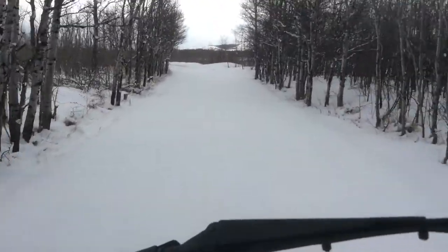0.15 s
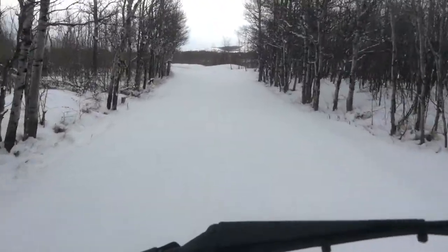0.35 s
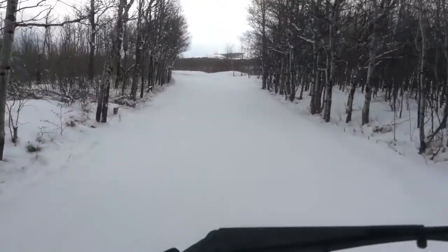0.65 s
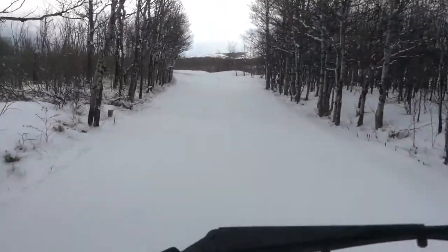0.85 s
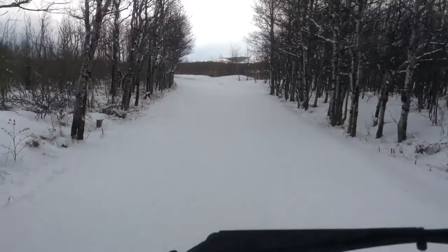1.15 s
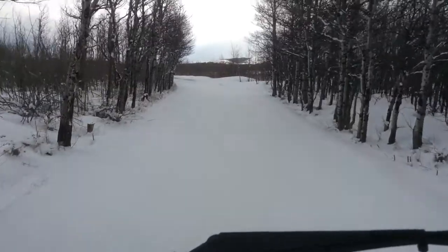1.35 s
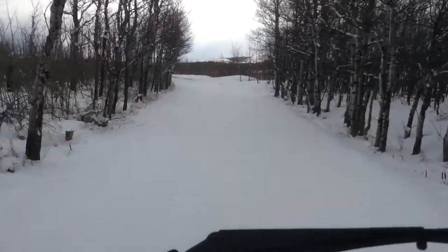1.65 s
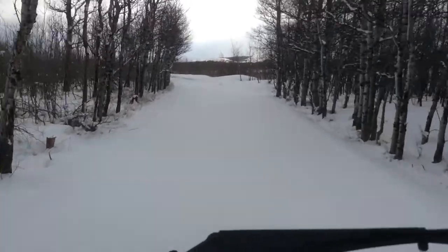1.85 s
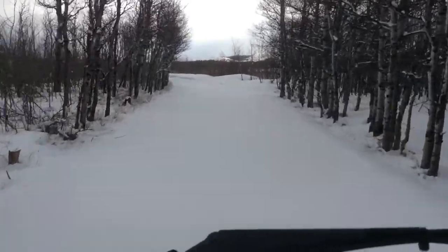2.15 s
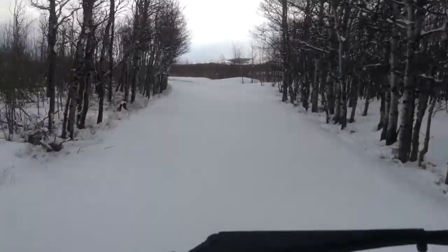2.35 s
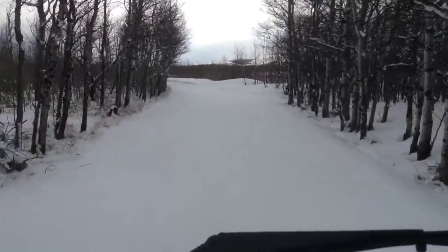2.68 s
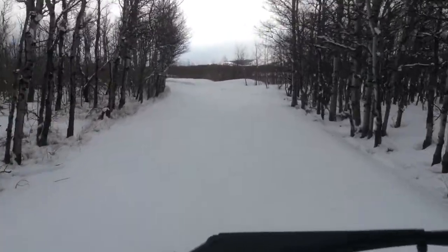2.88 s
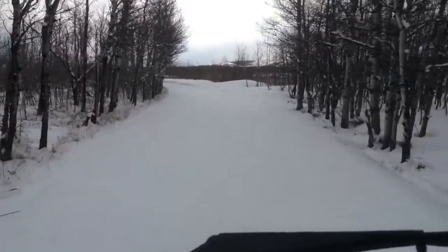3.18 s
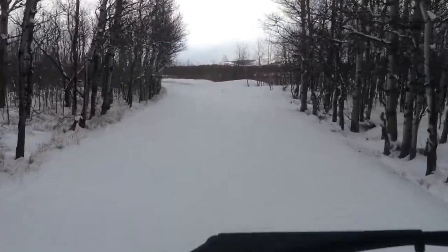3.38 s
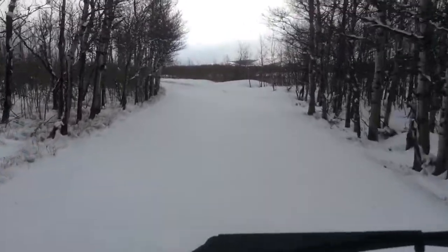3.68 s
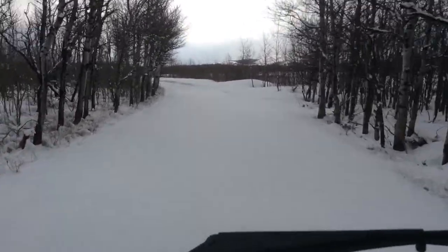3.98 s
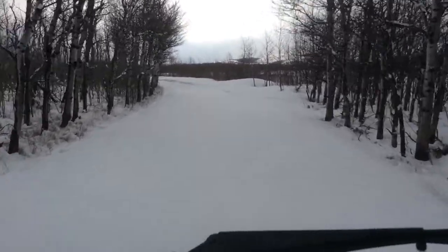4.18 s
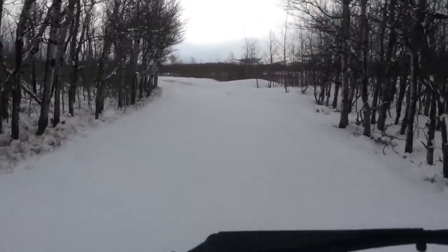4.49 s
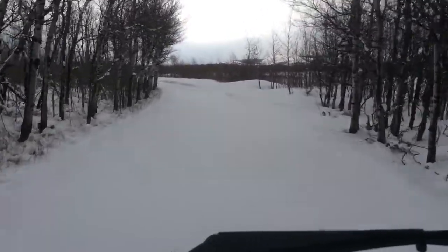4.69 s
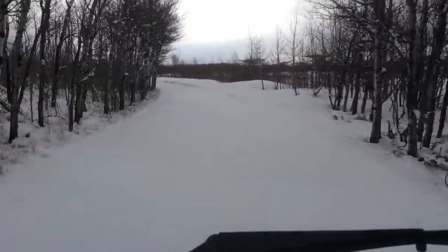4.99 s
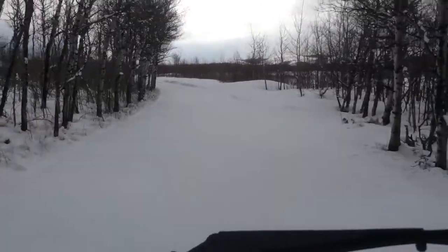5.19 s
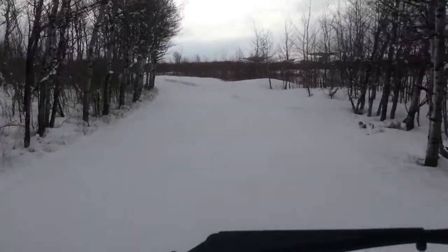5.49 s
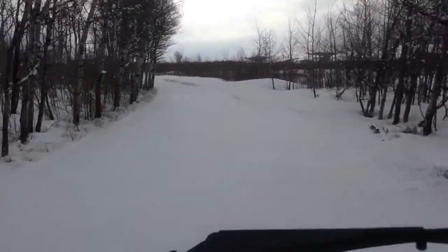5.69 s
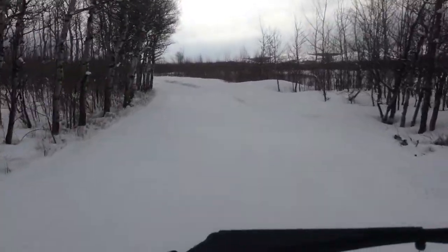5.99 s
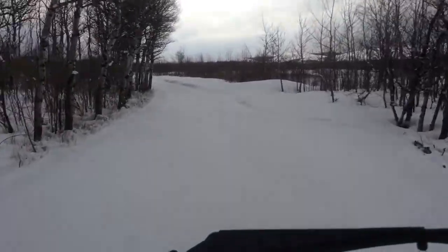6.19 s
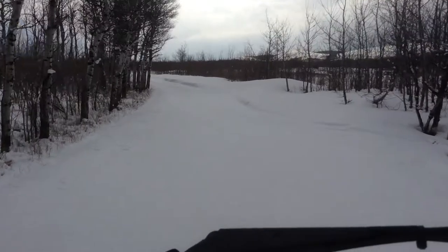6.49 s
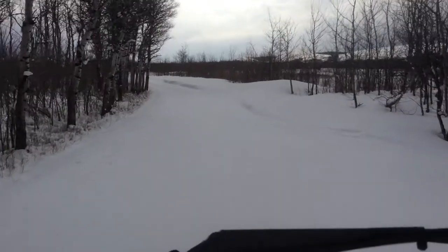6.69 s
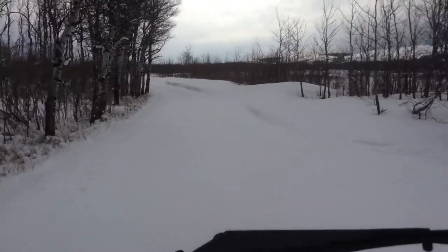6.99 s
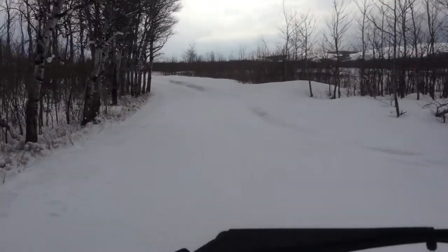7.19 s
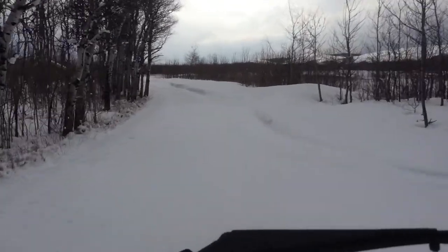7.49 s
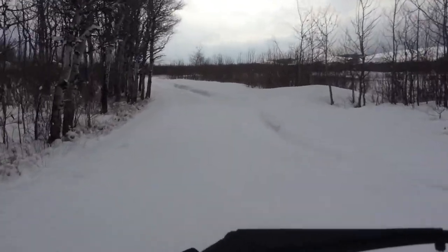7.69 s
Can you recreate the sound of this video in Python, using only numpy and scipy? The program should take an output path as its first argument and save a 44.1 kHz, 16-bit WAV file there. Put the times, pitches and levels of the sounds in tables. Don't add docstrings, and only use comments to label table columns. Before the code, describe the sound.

Inside a cab, a diesel engine drones and clatters steadily, pulling gently up to pace over a soft low rumble of snow under tyres.

```python
import sys
import numpy as np
from scipy import signal
from scipy.fft import rfft, irfft
from scipy.io import wavfile
from scipy.ndimage import uniform_filter1d

SR = 44100
rng = np.random.default_rng(int(sys.argv[2]) if len(sys.argv) > 2 else 0)


def to_linear_factor(level_db):
    exponent = np.asarray(level_db, float) / 20
    return 10 ** exponent


def put_to_file(sound):
    columns = np.atleast_2d(sound).T
    safe = np.clip(columns, -1, 1)
    whole_steps = np.round(safe * 32767)
    wavfile.write(sys.argv[1], SR, whole_steps.astype(np.int16))


N = 346185
CRAWL_HZ, PACE_HZ = 14.15, 16.0
# (centre [Hz], width [Hz], lift [dB])
CAB_MODES = [(58.0, 7.9, 9.7), (100.3, 7.0, 11.3), (115.3, 7.0, 11.0), (138.6, 7.9, 10.3),
             (153.4, 8.9, 7.6), (192.0, 9.0, 2.6), (217.4, 25.0, 14.4), (256.0, 11.0, 6.9),
             (280.7, 26.8, 7.0), (304.0, 12.9, 4.8), (356.0, 11.0, 5.7), (380.0, 34.0, 7.1),
             (420.3, 50.0, 7.1), (488.3, 7.0, 2.9)]


def noise():
    return rng.standard_normal(N)


def colour(x, shape, peaks=()):
    hz = np.arange(N // 2 + 1) * SR / N + 1
    points, gains = np.transpose(shape)
    db = np.interp(np.log(hz), np.log(points), gains)
    db = db + sum(lift / (1 + (2 * (hz - f) / w) ** 2) for f, w, lift in peaks)
    y = irfft(rfft(x) * to_linear_factor(db), N)
    return y / y.std()


def walk(rate):
    held = np.repeat(rng.standard_normal(int(N * rate / SR) + 2), 16)
    slewed = uniform_filter1d(uniform_filter1d(held, size=16), size=16)
    return 1.05 * np.interp(np.arange(N) * (16 * rate / SR), np.arange(len(held)), slewed)


def control(table):
    return np.interp(np.arange(N) / SR, *np.transpose(table))


def repeating(turn, keep, size):
    fresh = rng.standard_normal((int(turn[-1]) + 2, size))
    keep = min(keep, .995)
    renewed = np.sqrt(1 - keep ** 2)
    fresh[0] /= renewed
    turns = signal.lfilter([renewed], [1, -keep], fresh, axis=0)
    return np.interp(turn * size, np.arange(turns.size), turns.ravel())


def burst(firings, lag, rise, fall):
    p = (firings - lag) % 1
    return (1 - np.exp(-p / rise)) * np.exp(-p / fall)


def pace_share(hz):
    return (hz - CRAWL_HZ) / (PACE_HZ - CRAWL_HZ)


def surge():
    # (time [s], swing [%])
    swings = [(0, 1.1), (.52, 1.1), (1, .65), (1.33, .65), (1.68, .95), (2.06, .75), (2.47, .95),
              (2.86, .45), (3.33, .35), (3.72, .3), (4.04, .15), (4.36, .33), (4.72, .2), (4.98, .15),
              (5.35, .32), (5.71, .45), (6.1, .5), (6.54, .47), (6.99, .4), (7.46, .5), (7.9, .5)]
    crests = np.transpose(swings)[0]
    place = np.interp(np.arange(N) / SR, crests, np.arange(len(crests)))
    return 1 + control(swings) / 100 * np.cos(2 * np.pi * place)


def trim(events, attack_s, t60_s, grit):
    out = np.zeros(N)
    t = np.arange(int(.12 * SR)) / SR
    shape = (1 - np.exp(-t / attack_s)) * np.exp(-np.log(1000) * t / t60_s)
    for s, db, hz in events:
        ring = np.sin(2 * np.pi * hz * t + grit * np.cumsum(rng.standard_normal(len(t))))
        out[int(s * SR):int(s * SR) + len(t)] += to_linear_factor(db) * shape / shape.max() * ring
    return out


def loose_trim():
    # (time [s], peak level [dB], ring [Hz])
    knocks = [(0.186, -39.5, 567), (0.586, -36.5, 573), (1.252, -40, 552), (1.519, -34, 566),
              (1.59, -39, 580), (1.647, -44, 570), (1.94, -38.5, 562), (2.091, -44, 645)]
    # (time [s], peak level [dB], ring [Hz])
    ticks = [(4.853, -52, 11500), (5.5154, -47, 13200), (5.5245, -42, 13800), (5.586, -52, 15300)]
    # (time [s], peak level [dB], ring [Hz])
    clacks = [(.167, -41, 720), (3.881, -43, 780), (4.068, -48, 751), (5.575, -58, 724), (6.192, -40, 724),
              (6.374, -39, 736), (7.254, -39, 730)]
    out = trim(knocks, attack_s=0.0074, t60_s=0.1, grit=.01)
    out = out + to_linear_factor(-6) * trim(ticks, attack_s=.0005, t60_s=.02, grit=.62)
    return out + to_linear_factor(4.5) * trim(clacks, attack_s=0.0044, t60_s=0.033, grit=0.053)


def snow():
    # (frequency [Hz], level [dB])
    rumble = [(20, -20), (32, -26), (42, -16), (50, -3), (60, -4), (90, -1), (140, -2), (220, -2.5),
              (310, -3), (400, -.5), (520, -9), (620, -21), (900, -32), (1500, -53), (3000, -130)]
    swell = to_linear_factor(2.1 * walk(6) + 1.54 * walk(20))
    return colour(noise() * swell, rumble, [(f, 4.0 * w, 0.37 * lift) for f, w, lift in CAB_MODES])


def thud(cycle):
    # (frequency [Hz], level [dB])
    bulkhead = [(150, -11), (240, -15), (310, -14), (370, -6), (450, -11), (570, -19), (650, -22),
                (760, -21), (900, -25), (1500, -66), (3000, -130)]
    shaft = 2 * cycle
    size_db = 2.5 * rng.standard_normal(int(shaft[-1]) + 2)
    size_db[::2] -= 5
    blow = repeating(cycle, keep=.8, size=1024) * burst(shaft, lag=0.001, rise=.05, fall=.3)
    return colour(blow * to_linear_factor(size_db[shaft.astype(int)]), bulkhead)


def turbo(effort):
    centre_hz = 6960 + 460 * effort
    slow = colour(noise(), [(120, -5), (300, 1), (700, -41), (2000, -77.5)])
    return slow * np.sin(2 * np.pi * np.cumsum(centre_hz) / SR)


def injectors(cycle, effort):
    # (frequency [Hz], level [dB])
    hiss = [(2000, -40), (3000, -6), (3800, 0), (5000, -4), (6300, -5), (8600, -7), (10000, -6.5),
            (12000, -7), (14500, -9.5), (15710, -9), (15760, -60)]
    # (centre [Hz], width [Hz], lift [dB])
    pipes = [(4660, 70, 5), (5620, 120, 4), (6850, 200, 2), (9150, 250, 2.5), (10550, 200, 2),
             (10850, 120, 4), (11600, 900, 1.5), (12900, 300, 1.5), (15570, 90, 5)]
    # (frequency [Hz], level [dB])
    vent = [(2500, -40), (3700, 0), (5000, -4), (7500, -9), (10000, -20), (15000, -50)]
    # (centre [Hz], width [Hz], lift [dB])
    whistles = [(9080, 250, 17), (10700, 500, 15), (12100, 200, 16), (12900, 400, 15)]
    size_db = 1.4 * np.tanh(.7 * rng.standard_normal(int(4 * cycle[-1]) + 2))
    size_db[3::4] += .8
    size_db[::4] += 1.1
    each_db = size_db[(4 * cycle).astype(int)]
    gate = 0.062 + burst(4 * cycle, lag=0.01, rise=0.13, fall=0.66) * to_linear_factor(each_db)
    gate = uniform_filter1d(gate, size=170) / gate.mean()
    spray = colour(noise(), hiss, pipes) * gate ** .8
    spray = spray + .55 * colour(noise(), vent)
    chirp = colour(noise(), [(8500, -40), (9500, -8), (10700, 0), (11400, -20), (13000, -70)])
    chirp = chirp * gate ** 2 * to_linear_factor(2.5 * walk(14))
    boost = colour(noise(), [(8000, -20), (9000, 0), (13000, 0), (14000, -20)], whistles)
    boost = boost * gate * to_linear_factor(1.5 * walk(6) + 1.5 * walk(25))
    out = spray / spray.std() + to_linear_factor(-19 + 4 * effort) * chirp
    out = out + to_linear_factor(-21 + 9 * effort) * boost
    return out + to_linear_factor(-9.5 + .5 * effort) * turbo(effort) * gate


def valves(cycle):
    # (place in the cycle [0-1], peak level [dB], ring [Hz], t60 [s])
    blows = [(0.086, -45.3, 720, 0.06), (0.098, -49.6, 980, 0.03), (0.181, -53.4, 570, 0.1),
             (0.292, -43.2, 740, 0.06), (0.364, -40.1, 830, 0.03), (0.397, -47.7, 980, 0.03),
             (0.444, -50.2, 720, 0.03), (0.565, -48.3, 760, 0.03), (0.614, -46.3, 1080, 0.1),
             (0.637, -49.0, 1200, 0.03), (0.783, -48.3, 760, 0.03), (0.844, -47.8, 720, 0.03),
             (0.885, -55.8, 790, 0.1), (0.966, -45.1, 640, 0.1)]
    lag_turns = .014
    out, turns = np.zeros(N), np.arange(int(cycle[-1]))
    t = np.arange(int(.08 * SR)) / SR
    for place, db, hz, t60_s in blows:
        late, size = rng.standard_normal((len(turns), 2)).T
        moments = np.abs(turns + place + lag_turns + .0007 * late)
        hits = np.zeros(N)
        hits[np.searchsorted(cycle, moments)] = to_linear_factor(db + 1.8 * size)
        ring = (1 - np.exp(-t / 0.00068)) * np.exp(-np.log(1000) * t / t60_s) * np.sin(2 * np.pi * hz * t)
        out += signal.oaconvolve(hits, ring / ring.max())[:N]
    return out


def tones(cycle, multiples, levels_db, sway_db, sway_hz, drift):
    routes = [(3, 0.94, 0.378, 0.042), (9, 0.19, 0.802, 0.252), (15, 0.62, 0.848, 0.426),
              (21, 0.98, 0.688, 0.241), (27, 0.73, 0.39, 0.09)]
    out = 0
    for k, db in zip(multiples, levels_db):
        first, start, lag, spread = [route for route in routes if route[0] <= k][-1]
        turns = k * cycle + start + lag * (k - first) + spread * (k - first) ** 2
        phase = 2 * np.pi * turns + drift * walk(5)
        out = out + np.sqrt(2) * to_linear_factor(db + sway_db * walk(sway_hz)) * np.sin(phase)
    return out


def thin_lines(hz, cycle):
    # (multiple of the cycle rate, level at a crawl [dB], level climbing [dB], level at pace [dB])
    line_levels = [(22.5, -66, -51, -60), (42, -72, -58, -76), (51, -60, -62, -72), (63, -72, -60, -72),
                   (75, -62, -72, -69)]
    levels_db = [np.interp(pace_share(hz), [0, .72, 1], row[1:]) for row in line_levels]
    return tones(cycle, [row[0] for row in line_levels], levels_db, sway_db=2, sway_hz=9, drift=.5)


def firing(cycle):
    # (frequency [Hz], level [dB])
    slope = [(800, -30), (1150, -8), (1300, 0), (2000, -3), (3300, -3), (3700, -14), (4500, -50)]
    # (centre [Hz], width [Hz], lift [dB])
    rings = [(640, 50, 8), (740, 90, 5), (990, 70, 8), (1080, 60, 11), (1345, 60, 9), (1550, 70, 14),
             (1660, 80, 15), (1860, 50, 8), (2050, 60, 10), (2130, 40, 7), (2400, 70, 8), (2500, 50, 8),
             (2815, 60, 11), (2925, 70, 10), (3140, 50, 6), (3350, 70, 11)]
    wave = irfft(np.exp(2j * np.pi * rng.random(257)), 512)
    place = 4 * cycle % 1 * 512
    pressure = np.interp(place, np.arange(512), wave, period=512)
    return colour(pressure * to_linear_factor(walk(8)), slope, rings)


def knock(cycle):
    # (frequency [Hz], level [dB])
    block = [(300, -52), (500, 2.5), (620, -1.5), (750, 0.5), (900, -5.5), (1100, -3.5), (1270, -8),
             (2300, -9.5), (3000, -9), (3400, -13.5), (4000, -27.5), (5000, -84), (7000, -120)]
    # (centre [Hz], width [Hz], lift [dB])
    panels = [(570, 30, 3), (640, 35, 4), (685, 30, -4), (730, 60, 4), (980, 60, 2), (1075, 50, 6),
              (1345, 50, 4), (1500, 30, -4), (1550, 50, 4), (1660, 40, 3), (1780, 50, 3), (1990, 50, 2.5),
              (2225, 80, 3), (2290, 70, -5), (2410, 55, 6), (2630, 100, -3), (2810, 70, 3.5),
              (2920, 50, 2.5), (3090, 60, -2.5), (3355, 55, 5)]
    own = repeating(cycle, keep=0.92, size=2048)
    blow = .5 * own + .8 * noise()
    gate = .5 + burst(4 * cycle, lag=0.084, rise=0.049, fall=1.0)
    return colour(gate * blow, block, panels) * to_linear_factor(.4 * walk(9))


def hum(hz, cycle):
    # (level at a crawl [dB], level at pace [dB]), from the third multiple up
    orders_db = [(-56.0, -54.5), (-41.5, -41.0), (-51.0, -51.5), (-54.0, -53.0), (-61.0, -61.5),
                 (-48.5, -51.5), (-51.0, -49.0), (-53.5, -53.0), (-53.0, -55.5), (-49.0, -45.0),
                 (-59.0, -55.0), (-55.5, -52.5), (-58.5, -61.0), (-57.0, -53.0), (-58.0, -58.5),
                 (-57.0, -58.5), (-64.5, -62.0), (-58.5, -56.5), (-58.5, -60.5), (-59.0, -57.0),
                 (-62.5, -62.0), (-56.0, -55.5), (-63.0, -66.0), (-60.5, -63.0), (-64.0, -62.5),
                 (-62.5, -63.5), (-65.0, -66.0), (-62.0, -62.0), (-66.5, -67.0), (-65.0, -69.0)]
    orders = range(3, 3 + len(orders_db))
    rates = np.linspace(hz.min(), hz.max(), 64)

    def cab_db(f):
        modes_db = sum(lift / (1 + (2 * (f - c) / w) ** 2) for c, w, lift in CAB_MODES)
        return 3.8 * np.log2(f / 200) + modes_db

    levels_db = []
    for k, db in zip(orders, orders_db):
        at_rates = np.interp(rates, [CRAWL_HZ, PACE_HZ], db) + cab_db(k * rates)
        levels_db.append(np.interp(hz, rates, at_rates))
    boom = tones(cycle, orders[:2], levels_db[:2], sway_db=2.8, sway_hz=17, drift=.3)
    rest = tones(cycle, orders[2:], levels_db[2:], sway_db=1.2, sway_hz=7, drift=.2)
    return boom + to_linear_factor(.2) * rest


def scene():
    # (time [s], engine cycle rate [Hz])
    speed = [(0, 14.17), (.4, 14.1), (.8, 14.08), (1.2, 14.24), (1.6, 14.48), (2.6, 15.2), (3.4, 15.56),
             (4, 15.805), (4.8, 16.025), (5.9, 16.095), (6.5, 16.045), (7.85, 15.955)]
    # (time [s], effort [0-1])
    pedal = [(0, 0), (1.1, .6), (1.6, .95), (3, 1), (4.6, .7), (5.3, .05), (7.85, 0)]
    # (time [s], level [dB])
    track = [(0, -40), (.8, -42), (1.3, -39.5), (2.5, -41), (6.5, -42.5), (7.85, -42)]
    hz, effort, track_db = control(speed) * surge(), control(pedal), control(track)
    cycle = np.cumsum(hz) / SR
    crank = cycle + .001 * np.abs(3 + walk(10))

    road = to_linear_factor(track_db + 3.0) * snow() + to_linear_factor(track_db - 9) * thud(cycle + .2)
    engine = to_linear_factor(-61.5 - .1 * effort) * injectors(np.abs(cycle - .025), effort)
    engine = engine + to_linear_factor(-7 + 6.5 * pace_share(hz)) * valves(crank) + thin_lines(hz, crank)
    engine = engine + to_linear_factor(-56.5) * firing(cycle + .15 * (crank - cycle))
    engine = engine + to_linear_factor(-46 + 1.88 * effort) * knock(crank) + hum(hz, cycle)
    fade_in = np.minimum(np.arange(N) / SR / .002, 1)
    return (loose_trim() + road + engine)[None] * fade_in


def roll_off(x):
    return signal.sosfilt(signal.butter(12, 15850, fs=SR, output="sos"), x)


def record(dry):
    return roll_off(dry)


dry = scene()
out = record(dry)
put_to_file(out)
```